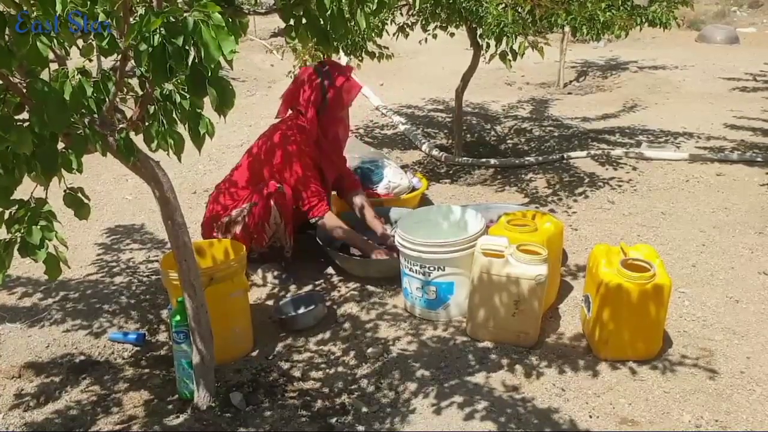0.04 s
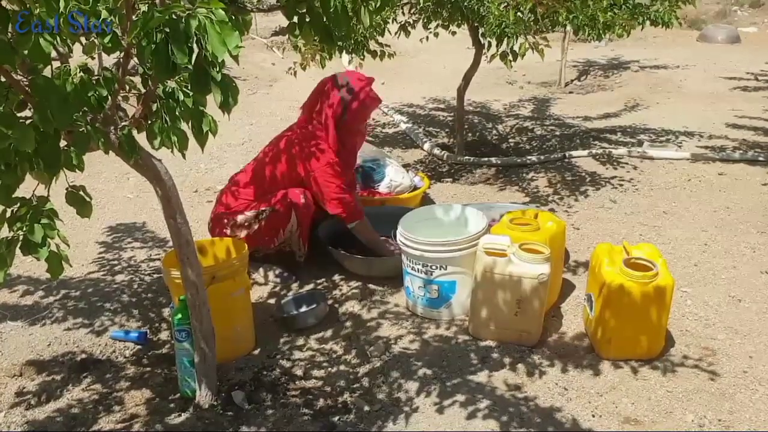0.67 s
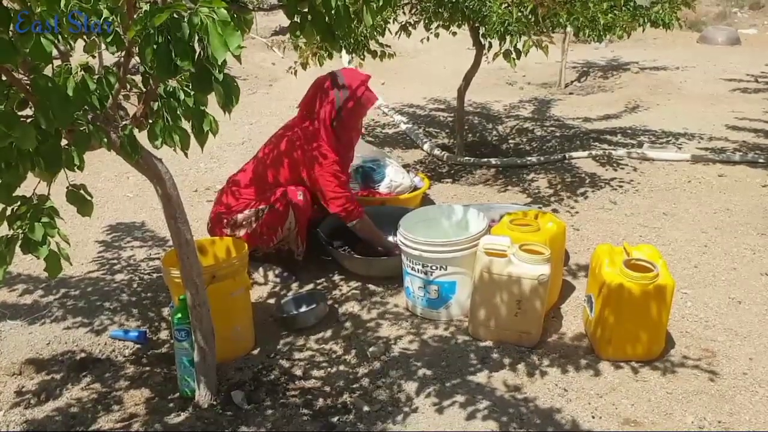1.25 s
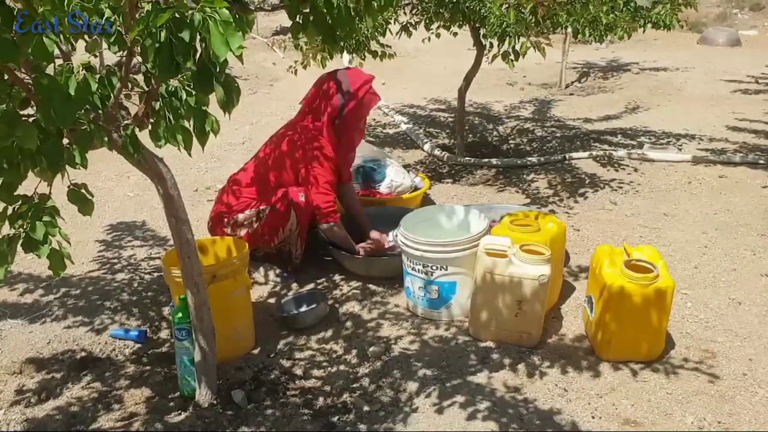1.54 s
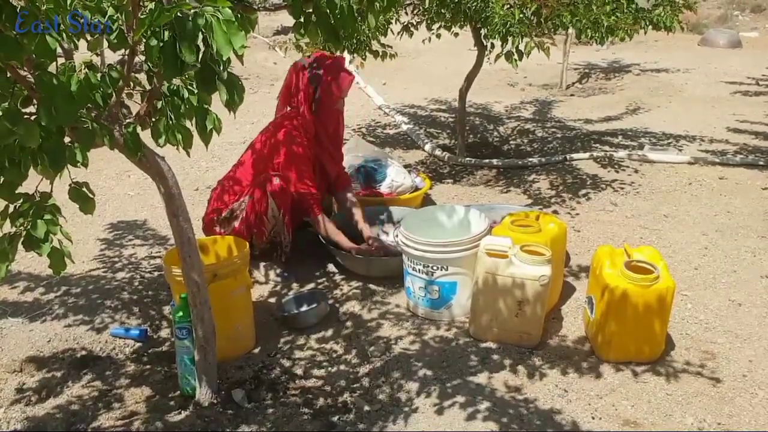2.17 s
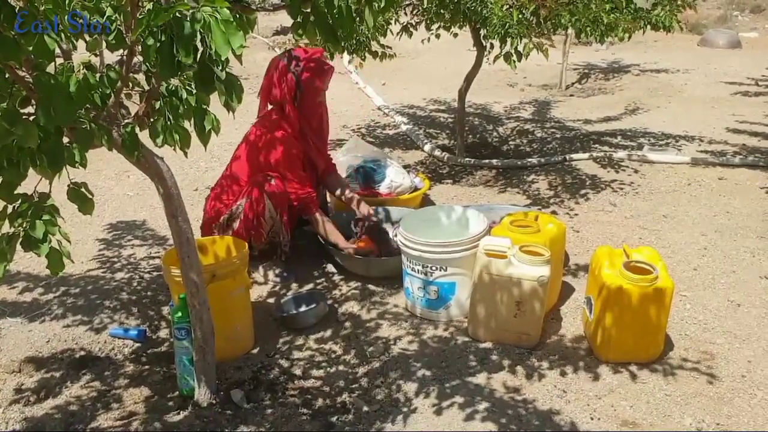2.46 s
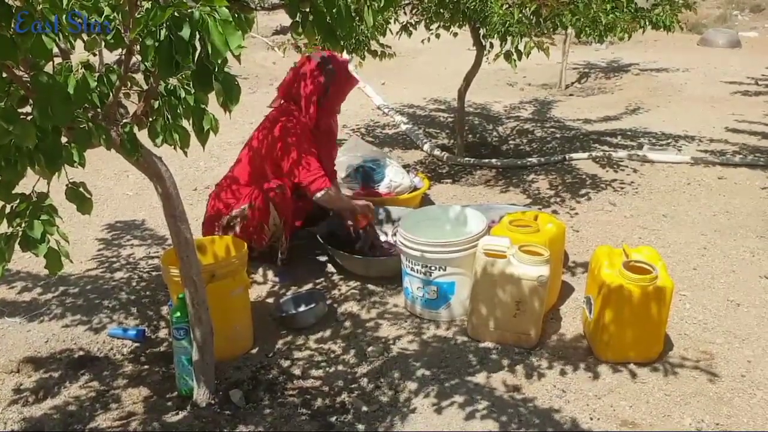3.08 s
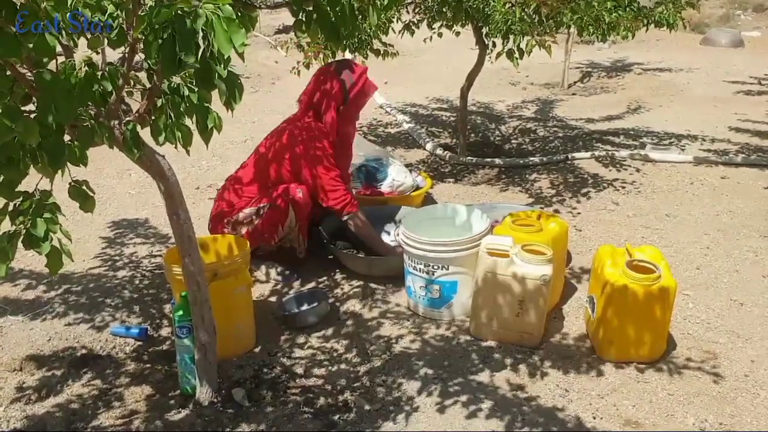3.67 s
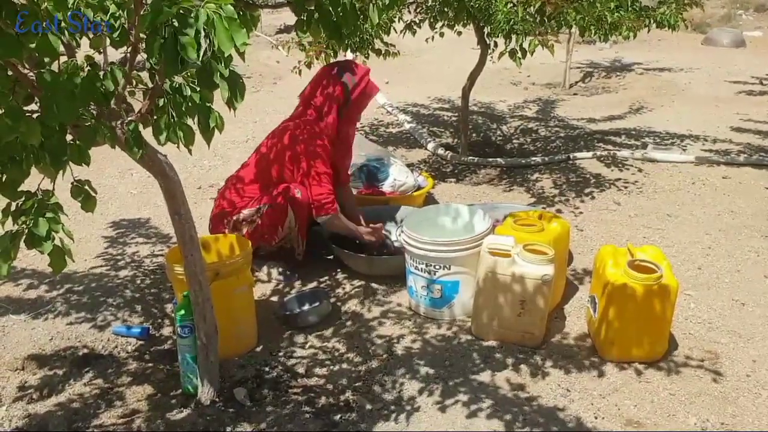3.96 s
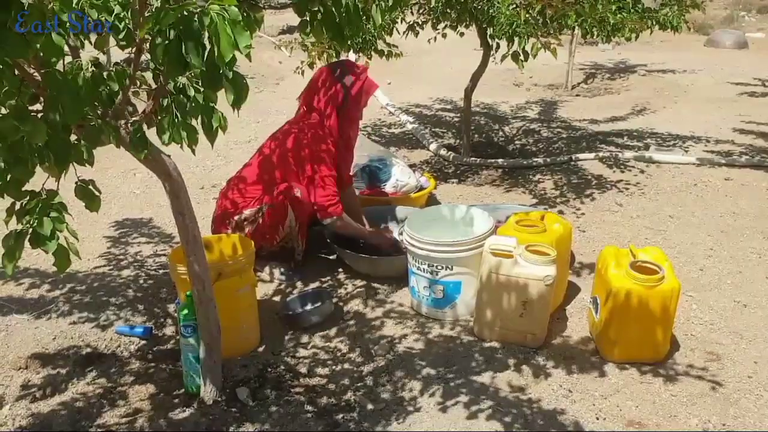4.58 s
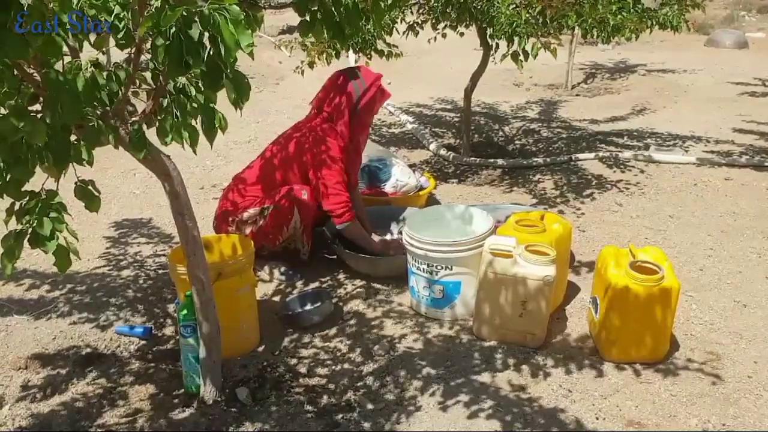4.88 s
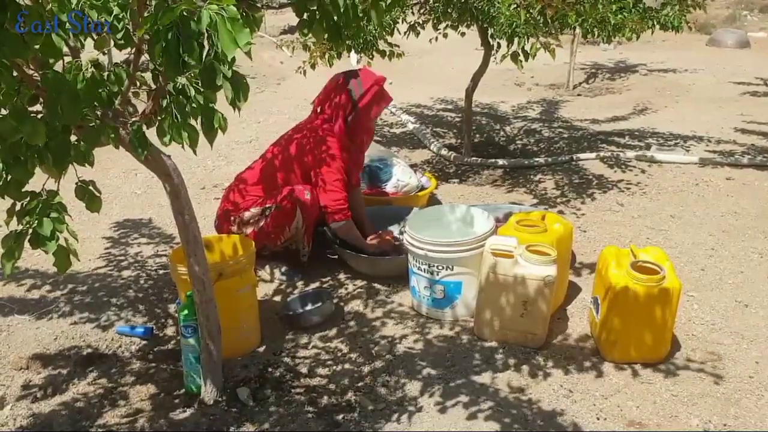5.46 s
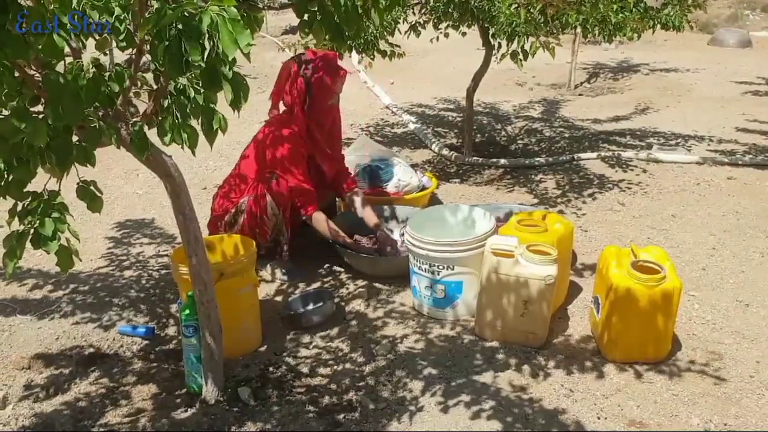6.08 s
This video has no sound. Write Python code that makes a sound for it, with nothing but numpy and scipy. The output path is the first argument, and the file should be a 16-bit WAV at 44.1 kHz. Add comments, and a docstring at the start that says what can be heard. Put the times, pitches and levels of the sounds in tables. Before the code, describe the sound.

Close hand washing of clothes, with uneven sloshes, splats and soft basin knocks, under rumbling wind gusts and distant bird chirps.

```python
"""Hand washing in a basin in an open yard, close to the microphone, with sparrows off in the trees.
It opens on a knock and a splat as the wet bundle bumps the basin. Uneven strokes follow: cloth squelches,
suds crackle and drops fly, while sparrows cheep now and then. Wind buffets the microphone, mostly at its
left port, hardest from about 2.6 to 3.7 s. Around 5 and 6 s the basin knocks again among more splats,
and between those knocks a gust briefly strikes the right port."""
import sys
import numpy as np
from scipy import signal
from scipy.fft import rfft, irfft, next_fast_len
from scipy.io import wavfile
from scipy.ndimage import uniform_filter1d

SR = 44100
rng = np.random.default_rng(int(sys.argv[2]) if len(sys.argv) > 2 else 0)


def store_pcm(level_fs):
    """Save levels as 16-bit WAV."""
    pcm = np.round(np.clip(level_fs, -1, 1) * 32767).astype(np.int16)
    wavfile.write(sys.argv[1], SR, np.atleast_2d(pcm).T)


N = 279153

# Strokes of the hands. Each row: middle in seconds, rubbing in relative dB, length in seconds,
# suds in relative dB.
STROKES = [(0.493, -73, 0.13, -83), (1.129, -74.5, .16, -87), (1.754, -82, 0.19, -99),
           (2.317, -72, 0.18, -95), (2.815, -69.5, .06, -80.5), (3.428, -65.5, .12, -85),
           (3.595, -68, 0.063, -80), (3.754, -69, 0.039, -80), (4.038, -82.5, 0.13, -77.5),
           (4.254, -70.5, .08, -93), (4.387, -74, 0.057, -95), (4.942, -64.5, 0.056, -84),
           (5.047, -73.5, .08, -93), (5.601, -69.5, 0.065, -83.5), (5.785, -77.5, .1, -88.5),
           (6.213, -75.5, 0.088, -83)]
# Gusts that stand out of the breeze. Each row: middle in seconds, level in relative dB,
# length in seconds, pitch of the eddy at the core in Hz.
GUSTS = [(0.086, -42, 0.087, 60), (0.375, -35, 0.11, 76), (1.152, -30, 0.033, 85), (1.55, -35, 0.03, 75.5),
         (1.998, -37.5, 0.16, 116), (2.679, -33, 0.2, 206.5), (2.736, -37, 0.02, 120),
         (2.812, -35.5, 0.17, 70), (2.972, -38, 0.033, 126), (3.098, -38.5, 0.029, 129),
         (3.359, -43.5, 0.086, 120), (3.643, -35, 0.037, 103), (3.68, -33, 0.12, 145.4),
         (3.713, -30.5, 0.063, 111), (5.581, -44, 0.15, 68), (6.229, -46, 0.14, 68.6)]


def scrubbing(trim_db=1, bubble_db=-9, roundness=1.04, fizz_lag_s=0.015, fizz_stretch=1.38):
    """Wet cloth squelches between the hands on each stroke; the foam fizzes a little later and longer."""
    # Spectra of rubbed cloth and of foam. Each row: frequency in Hz, relative density in dB.
    cloth_spectrum = [(250, -14.5), (450, -5.5), (750, 0.5), (1100, -18.5), (1520, 2.5), (1850, -5),
                      (2300, -7), (2700, -11), (3400, -16), (5000, -16), (8000, -22)]
    suds_spectrum = [(2500, -29), (4000, 2.5), (5500, -2), (6800, 10), (8000, -10), (9200, -19.5),
                     (11500, -10), (15500, -22.5)]
    rubbing, fizzing = np.zeros((2, N))
    for s, rub_db, length, suds_db in STROKES:
        rubbing += amp(rub_db + trim_db) * swell(s, length, roundness)
        fizzing += amp(suds_db + trim_db) * swell(s + fizz_lag_s, fizz_stretch * length, roundness)
    squelch = crackle(per_second=5000, spread_db=5, wash=0.83)
    squelch += amp(bubble_db) * bubbles(hz=1689, octaves=0.444, cycles=8.1, spread_db=4.5)
    suds = crackle(per_second=870, spread_db=0, wash=0.8)
    return rubbing * coloured(squelch, cloth_spectrum) + fizzing * coloured(suds, suds_spectrum)


def crackle(per_second, spread_db, wash, size=N):
    """Two trains of bursting bubbles of uneven size on a wash of noise."""
    pops = (rng.random((2, size)) < per_second / SR) * rng.standard_normal((2, size))
    pops *= amp(spread_db * np.minimum(rng.exponential(size=(2, size)), 3))
    return unit(unit(pops) + wash * rng.standard_normal((2, size)))


def bubbles(hz, octaves, cycles, spread_db, count=2200):
    """Small air pockets ring for a few cycles each, rising slightly in pitch."""
    start = rng.integers(0, N, (count, 1))
    pitch, loudness = rng.standard_normal((2, count, 1))
    i = np.arange(SR // 80)
    turns = hz * 2 ** (octaves * pitch) * i / SR
    age = turns / cycles
    envelope = amp(spread_db * loudness) * np.exp(-age) * (1 - np.exp(-turns))
    rings = envelope * np.sin(2 * np.pi * turns * (1 + 0.033 * age))
    return unit(np.bincount((start + i).ravel(), rings.ravel(), N)[:N])


def knocks(thud_hz=245, thud_t60=0.017, shudder_db=-14, blow_db=2, blow_t60=0.083):
    """The bundle thuds on the water-damped bottom; the basin shudders while its wall rings higher up."""
    # Bumps on the basin. Each row: start in seconds, slap and thud in relative dB, ring t60 in seconds.
    bumps = [(0.156, -52, -32, 0.2), (.763, -57, -47, 0.2), (4.445, -76, -53.5, 0.25),
             (5.081, -52, -45.5, 0.2), (5.924, -55.5, -50, 0.19), (5.957, -61.5, -80, 0.63),
             (6.081, -64, -87, 0.033)]
    # Resonances of the basin and its wall. Each row: frequency in Hz, width in Hz, relative level in dB.
    low_modes = [(176, 22, -16.5), (258, 33, -6.5), (352, 130, -9.5), (636, 140, -16)]
    wall_modes = [(808, 63, -6.5), (1440, 78, -4.5), (1998, 186, 2.5), (2394, 310, -3.5), (3080, 78, -4),
                  (3650, 414, -11), (5440, 170, -27.5), (6330, 150, -22)]
    out, t = np.zeros((2, N)), np.arange(SR // 2) / SR
    for s, slap_db, thud_db, t60 in bumps:
        dying = amp(-60 * t / t60)
        blow = amp(blow_db - 60 * t / blow_t60)
        spatter = crackle(per_second=3900, spread_db=6.5, wash=1, size=len(t))
        slap = resonant(spatter * (dying + blow), wall_modes) / np.std(resonant(spatter, wall_modes))
        shudder = unit(resonant(rng.standard_normal((2, len(t))), low_modes))
        shudder *= dying * (1 - np.exp(-t / 0.0058))
        thud = -np.sin(2 * np.pi * thud_hz * t) * amp(-60 * t / thud_t60) * (1 - np.exp(-t / 0.0025))
        add(out, s, amp(slap_db - 5.5) * slap + amp(thud_db + shudder_db) * shudder)
        add(out[0], s, amp(thud_db + 16.5) * thud)  # row 0 becomes the middle of the stereo image
    return out


def splats(crack_t60=0.013, spray_db=-7, skirt_db=-27, mist_db=-36):
    """A pocket of water bursts with a crack and a spray of droplets follows."""
    # Larger splats and squirts from the cloth. Each row: start in seconds, level in relative dB,
    # pitch in Hz, spread in octaves, spray t60 in seconds.
    squirts = [(0.155, -45.5, 3200, 0.42, 0.14), (.898, -45.5, 3990, 0.39, 0.088),
               (0.988, -58.5, 685, 0.17, 0.038), (1.14, -63, 6940, 0.14, 0.12), (1.27, -51, 267, 0.5, .19),
               (1.85, -49.5, 6160, 0.8, 0.16), (2.21, -65, 2230, 1.1, 0.099),
               (2.268, -63.5, 3500, 1.2, 0.15), (2.316, -61, 1204, 0.37, 0.032),
               (2.796, -61.5, 1900, 0.42, 0.093), (3.281, -60.5, 4020, 0.77, 0.18),
               (3.547, -52.5, 2140, .44, .12), (3.571, -46.5, 2330, 0.69, 0.15),
               (3.582, -47.5, 6630, 0.25, .1), (3.739, -60.5, 2380, 0.76, 0.17),
               (4.232, -67, 2180, 1.1, 0.05),  (4.827, -52.5, 4850, 0.34, 0.11),
               (5.081, -48.5, 705, 0.57, .13), (5.141, -46.5, 337, 0.31, .11),
               (5.207, -62.5, 6300, 0.2, 0.12), (5.805, -65, 925, 0.092, .052),
               (5.944, -59, 5550, 0.28, 0.14), (6.139, -62.5, 7840, 0.58, 0.22)]
    out, t = np.zeros((2, N)), np.arange(SR // 3) / SR
    for s, db, hz, octaves, t60 in squirts + droplets():
        def band(f):
            peak = np.exp(-0.5 * (np.log2((f + 1) / hz) / octaves) ** 2)
            return peak + amp(skirt_db) / (1 + (f / hz) ** 2) + amp(mist_db)
        drops = unit(filtered(crackle(per_second=2000, spread_db=2, wash=1, size=len(t)), band))
        crack = amp(-60 * t / crack_t60)
        spray = amp(spray_db - 60 * t / t60)
        rise_s = 0.0068 * t60 * (t60 / 0.087) ** 2  # long squirts start softly
        add(out, s, amp(db) * drops * (crack + spray) * (1 - np.exp(-t / rise_s)))
    return out


def droplets(per_stroke=2, boost_db=4, hz=2030, octaves=0.71, t60=0.11):
    """Rows of small splats that each stroke shakes loose by chance, louder for harder strokes."""
    scatter = rng.standard_normal((len(STROKES), per_stroke, 3)) * [0.3, 1.5, 0.35]
    return [(s + later * length, db + boost_db + louder, hz * 2 ** higher, octaves, t60)
            for (s, db, length, _), drops in zip(STROKES, scatter) for later, louder, higher in drops]


def wind(calm_db=-70.5, edge_s=0.0086, surge_db=4, surge_hz=16, flutter_db=-14, flutter_growth=1.254):
    """Wafts and gusts press on each port of the microphone separately; stronger wind is brighter."""
    # Wafts between lulls. Each row: start and length in seconds, relative dB, extra flutter in dB.
    wafts = [(0.277, 0.6, -50, -2), (0.957, .33, -42.5, -1), (1.393, 0.23, -52.5, -0.5),
             (1.699, .52, -49.5, 0), (2.371, 0.19, -43.5, 0.5), (2.607, 0.57, -37.5, 2.5),
             (3.169, 0.35, -44.5, 0.5), (3.551, 0.5, -42.5, -1.5), (4.02, 0.43, -50, 0),
             (4.642, 0.5, -46, -10), (5.133, .22, -52.5, 5), (5.886, 0.1, -54.5, 3)]
    # The side the wind strikes. Each row: time in seconds, left minus right in dB.
    wind_side = [(0, 52), (.4, 12), (1.3, 34), (2.6, 59), (2.87, 14.5), (3.68, 38), (3.92, 3.5), (4.3, 32),
                 (4.55, 0.5), (5.3, 15), (5.55, -39), (6.2, 32)]
    # Spectra of the deep buffet and the flutter above it. Each row: frequency in Hz, relative dB.
    buffet_spectrum = [(15, -38), (25, -16), (40, -1), (60, 4), (80, -4), (120, -11.5), (180, -29),
                       (300, -40), (500, -102)]
    flutter_spectrum = [(110, -8.5), (170, 7.5), (250, -2), (350, -8), (500, -25), (800, -36.5),
                        (1500, -51.5)]
    breeze_power = sum((amp(db) * plateau(s, length, edge_s)) ** 2 for s, length, db, _ in wafts)
    breeze_power += amp(calm_db) ** 2
    ragged_db = sum(extra * plateau(s, length, edge_s) for s, length, _, extra in wafts)
    gust_power = sum((amp(db) * swell(s, length)) ** 2 for s, db, length, _ in GUSTS)
    surges = unit(amp(surge_db * np.minimum(wobble(surge_hz, N), 1)))
    wind_db = 10 * np.log10(breeze_power * surges ** 2 + gust_power)
    buffet = amp(wind_db) * steadied(coloured(rng.standard_normal((2, N)), buffet_spectrum), span=0.068)
    flutter = steadied(coloured(rng.standard_normal((2, N)), flutter_spectrum), span=0.02)
    lumps = unit(amp(3 * wobble(29, N)))
    flutter *= lumps * amp(flutter_growth * wind_db + flutter_db + ragged_db)
    left_share = 1 / (1 + amp(-curves(wind_side)[0]) ** 2)
    ports = 2 * np.sqrt([left_share, 1 - left_share])
    return ports * (buffet + flutter + eddy_thumps())


def eddy_thumps(boost_db=8, whirl_db=-20, whirl_ratio=1.67):
    """An eddy thumps in each gust: suction in the core, pressure on both flanks, a small whirl inside."""
    out, t = np.zeros(N), np.arange(N) / SR
    eddy = lambda u: (2 * u ** 2 - 1) * np.exp(-u ** 2)
    for s, db, _, hz in GUSTS:
        near = np.abs(t - s) < 2 / hz
        offset = np.pi * hz * (t[near] - s)
        out[near] += amp(db + boost_db) * (eddy(offset) + amp(whirl_db) * eddy(whirl_ratio * offset))
    return out


def sparrows():
    """Raspy two-voiced cheeps, chirrups and thin peeps from a distance, scattered by the trees."""
    # Calls. Each row: start in seconds, level in relative dB, pitch ratio.
    cheep_calls = [(0.177, -73.5, 1.1), (1.298, -68, 0.99), (2.597, -71.5, 1.05), (3.156, -69.5, 1.03),
                   (4.623, -71.5, 1.02), (5.1, -67, 0.99)]
    chirrup_calls = [(1.893, -63.5, 1.0), (4.036, -67.5, 1.01)]
    peep_calls = [(2.725, -80, 0.72), (5.7, -79, 0.93)]
    # Their glides. Each row: seconds into the call, pitch in Hz at ratio 1, relative level in dB.
    cheep_shape = [(0, 4800, -22), (.013, 4550, -5), (.025, 4050, 0), (.035, 3950, -4), (.045, 3600, 1),
                   (.054, 3400, -4), (.063, 3150, -1), (.074, 3000, -25)]
    chirrup_shape = [(0, 3450, -5), (.018, 2950, -10), (.032, 3150, -6), (.047, 3850, -1), (.06, 3500, 2),
                     (.074, 3300, -1), (.084, 2950, -9), (.106, 2900, -20)]
    peep_shape = [(0, 4940, 17), (0.015, 5060, -7.5), (0.04, 4450, 8), (.07, 4380, -30)]
    upper = chirps(cheep_calls, cheep_shape, rasp=0.06, overtone_db=-35)
    # the other side of the syrinx joins a moment later, a third lower
    lower_calls = [(s + 0.004, db - 2, 0.82 * ratio) for s, db, ratio in cheep_calls]
    lower = chirps(lower_calls, cheep_shape, rasp=0.06, overtone_db=-35)
    peeps = chirps(peep_calls, peep_shape, rasp=0.04, overtone_db=-30)
    chirrups = chirps(chirrup_calls, chirrup_shape, rasp=0.045, overtone_db=-3)
    chirrups = filtered(chirrups, lambda hz: 1 / (1 + (hz / 6200) ** 20))  # leaves and distance dull them
    far = upper + lower + peeps
    return (far + chirrups) * amp([[1], [-1]]) + yard(amp(-1) * far + amp(-3) * chirrups)


def chirps(calls, shape, rasp, overtone_db, flutter_db=3):
    """A whistle glides along its shape; a quick flutter of pitch and level makes it raspy and broken."""
    out, size = np.zeros(N), int(shape[-1][0] * SR)
    hz, shape_db = curves(shape, size)
    for s, db, ratio in calls:
        phase = 2 * np.pi * np.cumsum(hz * ratio * (1 + rasp * wobble(300, size))) / SR
        level = amp(db + shape_db) * unit(amp(flutter_db * wobble(130, size)))
        whistle = np.sin(phase) + amp(overtone_db) * np.sin(2 * phase)
        add(out, s, level * signal.windows.tukey(size, 0.1) * whistle)
    return out


def yard(x):
    """Ground, trunks and cans scatter a short diffuse tail back to the microphone."""
    # Decay of the yard. Each row: frequency in Hz, t60 in seconds.
    decay = [(200, 0.28), (2000, 0.23), (10000, 0.24)]
    hz, t, noise = signal.stft(rng.standard_normal((2, SR // 2)), SR, nperseg=256)
    tail = signal.istft(noise * amp(-60 * t / along(decay, hz)[:, None]), SR, nperseg=256)[1]
    tail = np.pad(tail / np.linalg.norm(tail[0]), ((0, 0), (SR // 200, 0)))  # arrives 5 ms late
    return signal.fftconvolve(x[None], tail, axes=1)[:, :N]


def air(level_db=-69):
    """The quiet of the yard and the hiss of the microphone."""
    # Spectrum of the quiet. Each row: frequency in Hz, relative density in dB.
    spectrum = [(59, -17.5), (100, -3.5), (146, -27.5), (300, -25), (411, -30), (1060, -34.5),
                (1590, -31.5), (5750, -42), (6660, -42), (8410, -49), (11500, -39), (15500, -39.5)]
    # Its stereo image. Each row: frequency in Hz, left-right correlation.
    likeness = [(100, 0.52), (400, 0.29), (2000, 0.06), (5000, 0.078), (9000, 0.038)]
    hiss = coloured(rng.standard_normal((2, N)), spectrum)
    return amp(level_db) * stereo(hiss, likeness) * amp([[0.8], [-0.8]])


def amp(db):
    """Decibels to gain."""
    return 10 ** (np.asarray(db) / 20)


def unit(x):
    """x at rms 1."""
    return x / np.sqrt(np.mean(x ** 2) + 1e-20)


def along(points, hz):
    """(Hz, value) points read on a log axis."""
    f, v = np.transpose(points)
    return np.interp(np.log(hz + 1), np.log(f + 1), v)


def curves(rows, size=N):
    """One value per sample for each column after the time."""
    s, *cols = np.transpose(rows)
    return [np.interp(np.arange(size) / SR, s, c) for c in cols]


def filtered(x, response):
    """x through a gain that depends on frequency."""
    n = x.shape[-1]
    m = next_fast_len(n + 8192)
    return irfft(rfft(x, m) * response(np.fft.rfftfreq(m, 1 / SR)), m)[..., :n]


def coloured(x, spectrum):
    """x shaped by a (Hz, dB) spectrum, at rms 1."""
    return unit(filtered(x, lambda hz: amp(along(spectrum, hz))))


def resonant(x, modes):
    """x through damped resonances of alternating sign."""
    def response(f):
        return sum((-1) ** k * amp(db) * 1j * f * width / (hz * hz - f * f + 1j * f * width)
                   for k, (hz, width, db) in enumerate(modes))
    return filtered(x, response)


def stereo(pair, likeness):
    """Mix two unrelated signals, as mid and side, to left and right of a given likeness."""
    turn = lambda hz: np.arccos(np.clip(along(likeness, hz), -1, 1)) / 2
    mid, side = filtered(pair, lambda hz: np.array([np.cos(turn(hz)), np.sin(turn(hz))]))
    return np.array([mid + side, mid - side])


def add(track, s, sound):
    """Mix a sound into a track at s seconds."""
    part = track[..., max(round(s * SR), 0):][..., :sound.shape[-1]]
    part += sound[..., :part.shape[-1]]


def steadied(x, span):
    """x with its swells slower than span seconds evened out."""
    power = uniform_filter1d(np.abs(signal.hilbert(x)) ** 2, max(int(span * SR), 1), axis=-1) / 2
    return x / np.sqrt(np.abs(power) + 1e-6)


def wobble(hz, size):
    """A smooth random curve of rms 1 that moves up to about hz times a second."""
    return unit(filtered(rng.standard_normal(size), lambda f: np.exp(-(f / hz) ** 2)))


def swell(s, length, roundness=2):
    """A rise and fall around s seconds: a bell, or a sharper peak at lower roundness."""
    bell = np.zeros(N)
    i = np.arange(max(int((s - 3 * length) * SR), 0), min(int((s + 3 * length) * SR), N))
    bell[i] = np.exp(-np.abs(2 * (i / SR - s) / length) ** roundness)
    return bell


def plateau(s, length, edge):
    """A smooth rise at s seconds, a hold for length seconds and a smooth fall."""
    t = np.arange(N) / SR - s
    return (np.tanh(t / edge) - np.tanh((t - length) / edge)) / 2


def scene():
    """The basin stands close by, a little left of the microphone, with the open yard around it."""
    # Stereo image of the washing. Each row: frequency in Hz, left-right correlation.
    likeness = [(300, 0.69), (2000, 0.57), (4500, 0.2), (9000, 0.07)]
    washing = stereo(scrubbing() + knocks() + splats(), likeness) * amp([[2], [-2.3]])
    return washing + amp(-10) * yard(washing.mean(0)) + sparrows() + air() + wind()


def record(dry):
    """The camera keeps nothing above its band limit."""
    return filtered(dry, lambda hz: hz < 15550)


dry = scene()
out = record(dry)
store_pcm(out)
```